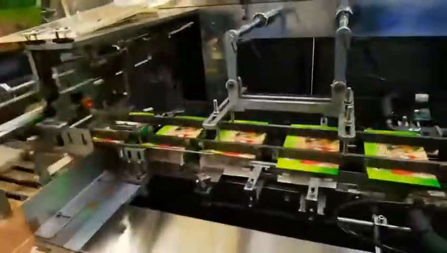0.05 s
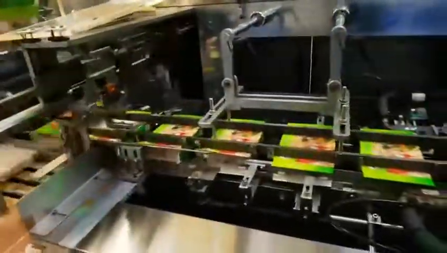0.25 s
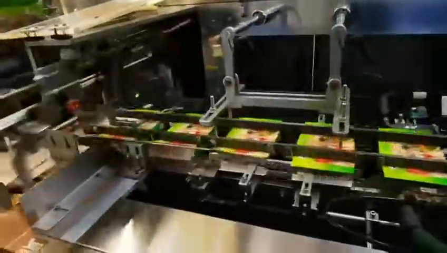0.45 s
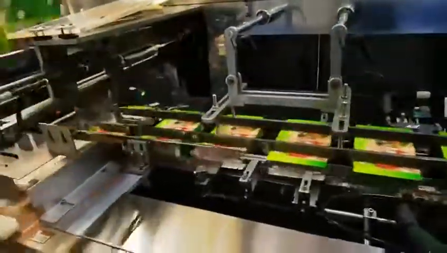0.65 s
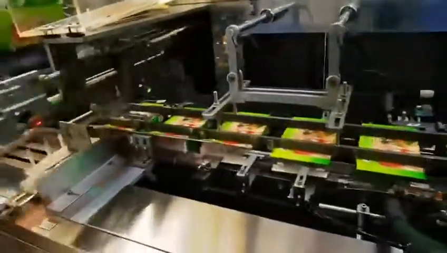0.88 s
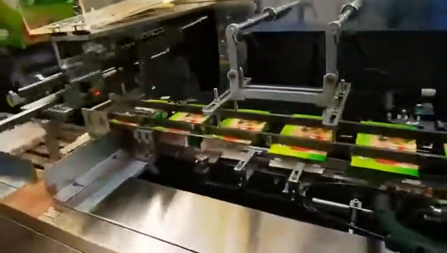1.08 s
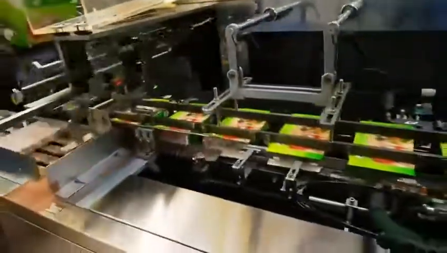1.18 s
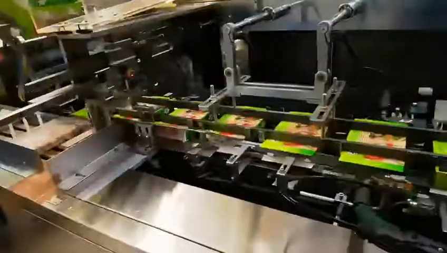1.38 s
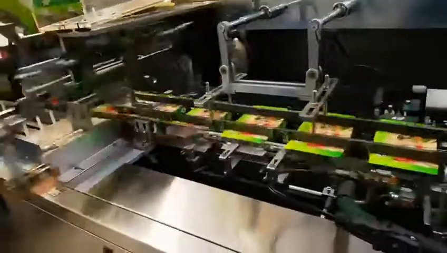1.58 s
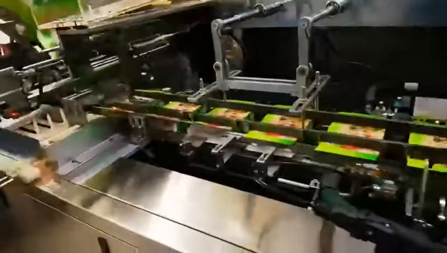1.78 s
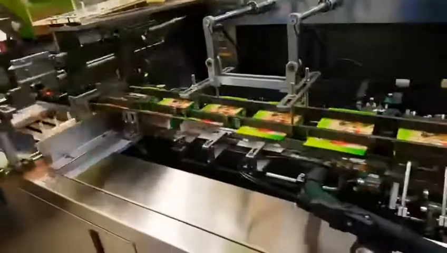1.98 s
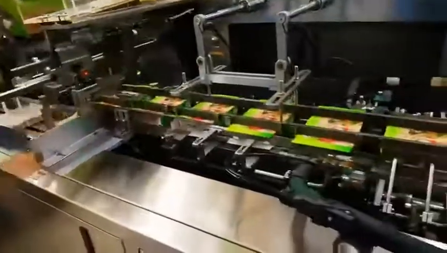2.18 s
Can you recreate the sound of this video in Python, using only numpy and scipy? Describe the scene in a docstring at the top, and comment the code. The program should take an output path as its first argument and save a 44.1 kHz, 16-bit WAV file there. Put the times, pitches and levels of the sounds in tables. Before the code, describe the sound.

Packing machine rattling and clacking in a factory hall, one sharp burst of venting air

```python
"""Cartons slide and a motor hums first, then a latch clicks, in a factory hall close by a cartoning machine.
Chains and arms rattle the steel frame and levers knock it: jolts and blows ring banks of resonances.
At a quarter second a valve vents air: a shrill whistle of port modes, then noise whose band widens downward.
The microphone rolls off the bass, and the recorder's gain control ducks after loud sound."""
import sys
import numpy as np
from scipy import signal
from scipy.fft import rfft, irfft, next_fast_len
from scipy.io import wavfile
from scipy.ndimage import uniform_filter1d, map_coordinates

SR = 44100
rng = np.random.default_rng(int(sys.argv[2]) if len(sys.argv) > 2 else 0)


def master(y):
    """Save y as 16-bit WAV."""
    cut = np.clip(np.atleast_2d(y).T, -1, 1)
    pcm = np.round(cut * 32767)  # scale
    wavfile.write(sys.argv[1], SR, pcm.astype(np.int16))


N = 99225


def amp(db):
    """Decibels to gain."""
    return 10 ** (np.asarray(db) / 20)


def unit(x):
    """Scale to rms 1."""
    return x / np.sqrt(np.mean(x ** 2) + 1e-20)


def along(points, hz):
    """(frequency [Hz], value) points read on a log frequency axis."""
    f, v = np.transpose(points)
    return np.interp(np.log(hz + 1), np.log(f + 1), v)


def clock():
    """Time of each sample [s]."""
    return np.arange(N) / SR


def level(rows):
    """Gain per sample from (time [s], level [dB]) rows."""
    return amp(np.interp(clock(), *np.transpose(rows)))


def wobble(knots_per_s):
    """A smooth curve through random knots."""
    knots = rng.standard_normal(400)
    return map_coordinates(knots, [clock() * knots_per_s], mode="wrap")


def noise():
    """White noise."""
    return rng.standard_normal(N)


def filtered(x, response):
    """x through a response given as a function of frequency, padded so that rings do not wrap."""
    m = next_fast_len(N + SR // 2)
    hz = np.fft.rfftfreq(m, 1 / SR)
    return irfft(rfft(x, m) * response(hz), m)[:N]


def coloured(x, spectrum):
    """x shaped by a (frequency [Hz], level [dB]) spectrum, at rms 1."""
    return unit(filtered(x, lambda hz: amp(along(spectrum, hz))))


def band(f, hz, width):
    """A broad causal band-pass, its width a share of its centre."""
    return 1 / (1 + 1j * (f / hz - hz / (f + 1)) / width)


def body(modes, f):
    """Causal response of a set of resonances, with alternating signs and unit power gain."""
    h = 0
    for k, (centre, width, db) in enumerate(modes):
        damping = 1j * f * width
        h = h + (-1) ** k * amp(db) * damping / (centre * centre - f * f + damping)
    return h / np.sqrt(np.mean(abs(h) ** 2))


def grains(per_s, spread_db):
    """Random tiny impacts of uneven size, at rms 1."""
    hits = rng.random(N) < per_s / SR
    return unit(hits * np.sign(noise()) * amp(spread_db * noise()))


def burst(start, attack_s, t60):
    """An envelope that rises, then dies away by 60 dB in t60 seconds."""
    age = np.maximum(clock() - start, 0)
    return (1 - np.exp(-age / attack_s)) * amp(-60 * age / t60)


def swell(start, rise_s, fall_db_per_s):
    """An envelope that climbs to 1, then falls steadily in dB."""
    age = clock() - start
    return np.clip(age / rise_s, 0, 1) * amp(-fall_db_per_s * np.maximum(age - rise_s, 0))


def add(out, s, x):
    """Mix x into out from time s."""
    part = out[round(s * SR):][:len(x)]
    part += x[:len(part)]


def panels(x, share, latest):
    """Close steel panels add reflections, up to latest samples late, that ripple the spectrum."""
    delays = rng.integers(latest // 10, latest, size=12)
    signs = rng.choice([-1, 1], size=12)
    copies = sum(s * np.roll(x, d) for d, s in zip(delays, signs)) / np.sqrt(len(delays))
    return (x + share * copies) / np.hypot(1, share)


# Decay of the hall around the machine: (frequency [Hz], t60 [s])
HALL_DECAY = [(150, 0.17), (1500, 0.094), (10000, 0.33)]


def room(x):
    """The hall's diffuse tail: decaying noise, shortest in the middle of the spectrum."""
    hz, t, z = signal.stft(rng.standard_normal(SR // 2), SR, nperseg=256)
    decay = amp(-60 * t / along(HALL_DECAY, hz)[:, None])
    tail = signal.istft(z * decay, SR, nperseg=256)[1]
    late_tail = np.pad(tail, (300, 0))  # it arrives 300 samples after the direct sound
    return signal.fftconvolve(x, late_tail / np.linalg.norm(tail))[:N]


# Shaking of the drive, before the hum and shake trims: (time [s], level [dB])
SHAKE_LEVEL = [(0.0, -58), (0.06, -44), (0.27, -41), (0.38, -47.5), (0.74, -40.5), (0.94, -57),
               (1.07, -45.5), (1.21, -47.5), (1.37, -38), (2.1, -44.5), (2.12, -40.5), (2.25, -55.5)]
# Dull bumps of the indexing drive: (time [s], level [dB])
DRIVE_BUMPS = [(0.243, -39), (1.046, -29), (1.44, -48), (2.124, -34.5)]
# Relative spectrum of the shaking drive: (frequency [Hz], level [dB per Hz])
DRIVE_SPECTRUM = [(25, -28), (42, -22), (55, -2.5), (80, -1), (130, -0.5), (200, -10.5), (330, -28.5)]
# Relative spectrum of the hall's din: (frequency [Hz], level [dB per Hz])
DIN_SPECTRUM = [(15, -41), (25, 2), (87, 6), (140, -25), (278, -37), (616, 0), (781, 2), (1070, 0.5),
                (1330, 0), (2780, -9), (3440, -7), (4250, -6), (9410, -6), (11000, -14), (14000, -25)]


def motor(hum_hz=98.7, hum_db=-11, shake_db=-3, hall_db=-44, bump_hz=85):
    """An unsteady hum, low shaking noise and decaying sine bumps, over the nearly steady din of the hall."""
    t = clock()
    waver = amp(3 * wobble(14))
    tone = np.sqrt(2) * np.sin(2 * np.pi * hum_hz * t + .5 * wobble(7.7))
    hum = amp(hum_db) * level(SHAKE_LEVEL) * waver * tone
    shake = amp(shake_db) * level(SHAKE_LEVEL) * coloured(noise(), DRIVE_SPECTRUM)
    bumps = np.zeros(N)
    for s, db in DRIVE_BUMPS:
        bumps += amp(db) * burst(s, attack_s=0.01, t60=0.12) * np.sin(2 * np.pi * bump_hz * (t - s))
    din = panels(coloured(noise(), DIN_SPECTRUM), share=0.64, latest=500)
    return hum + shake + bumps + amp(hall_db + wobble(6.06)) * din


def ticks(tick_db=-50):
    """Small loose parts tick at random all through the cycle and ring the steel."""
    taps = grains(per_s=45, spread_db=0.5)
    ring = filtered(taps, lambda f: body(RAIL_MODES + LATCH_MODES, f) * band(f, 3140, width=1.65))
    return amp(tick_db) * unit(ring)


# How hard the chain jolts the frame, before clustering: (time [s], level [dB])
RATTLE_LEVEL = [(0, -53), (.15, -47.5), (.24, -32.5), (.29, -43), (.47, -45), (.53, -34.5), (.68, -35),
                (.78, -34), (.83, -40), (.9, -56), (1.05, -48), (1.13, -42), (1.22, -45), (1.3, -34.5),
                (1.42, -33), (1.55, -37), (1.72, -38), (1.84, -34), (1.94, -36.5), (2, -49), (2.25, -49.5)]
# Resonances of the steel frame and guards: (frequency [Hz], width [Hz], level [dB])
FRAME_MODES = [(154, 61, -3.5), (210.4, 51, 0), (263, 135, -4), (413.3, 41, -1.5), (471, 18.3, 4),
               (554.3, 24, 1.5), (616.3, 21.2, 4), (742, 74, -3), (839, 49, 0.5), (931.6, 24, 6.5),
               (1025, 134, -17), (1240, 140, -9), (1490, 11, -11), (1900, 670, -15)]


def chain():
    """Links and rollers jolt the frame in uneven clusters and ring its resonances."""
    clusters = amp(2.0 * wobble(45.37))
    jolts = unit(grains(per_s=1300, spread_db=3) * clusters)
    return filtered(jolts * level(RATTLE_LEVEL), lambda f: body(FRAME_MODES, f))


# Cartons slipping past the belts: (time [s], level [dB], length [s])
SLIP_ARCHES = [(0.807, -44, 0.057), (1.287, -38, 0.17), (1.423, -43.5, 0.23), (1.91, -47, 0.31)]
# Relative spectrum of that sizzle: (frequency [Hz], level [dB per Hz])
SIZZLE_SPECTRUM = [(2500, -19), (4500, -18), (6400, 12.5), (8500, 1), (10900, 3.5), (12000, -7),
                   (14000, -12)]


def slips():
    """Smooth card swishes past in short arches of noise and fine grains."""
    arches = np.zeros(N)
    for s, db, length in SLIP_ARCHES:
        arches += amp(db) * np.sin(np.pi * np.clip((clock() - s) / length, 0, 1))
    return arches * coloured(noise() + grains(per_s=2800, spread_db=4), SIZZLE_SPECTRUM)


# Cartons sliding on the guides, before the rub and rail trims: (time [s], level [dB])
SLIDE_LEVEL = [(0, -42.5), (.05, -42), (.15, -53), (.45, -39.5), (.56, -31.5), (.68, -42), (.78, -50),
               (.83, -33.5), (.92, -54), (1, -43), (1.13, -42), (1.26, -52.5), (1.37, -43.5), (1.51, -48),
               (1.6, -40), (1.74, -44.5), (1.89, -50.5), (1.96, -41.5), (2.08, -51), (2.25, -43.5)]
# Relative spectrum of rubbing cardboard: (frequency [Hz], level [dB per Hz])
CARD_SPECTRUM = [(400, 2), (1100, 3), (1800, -1), (2800, 4.5), (3600, 2.5), (4800, 0.5), (6500, -3),
                 (8500, -3), (11000, -1.5), (12000, -11), (14000, -17)]
# Resonances of the thin guide rails: (frequency [Hz], width [Hz], level [dB])
RAIL_MODES = [(1039, 48, 8.5), (1223, 50, 9.5), (1591, 54, 4), (1967, 47, 2), (2100, 57, 4.5),
              (2438, 56, 2.5), (2738, 29, -10), (3097, 36, 5.5), (3340, 210, -3), (3795, 250, -1),
              (4510, 54, -1), (5200, 710, -10.5), (7100, 1100, -8.5)]


def cartons(rub_db=1.5, rail_db=-2):
    """Cardboard rubs and ticks along the guides and rings the rails."""
    rub = coloured(unit(noise() + 1.2 * grains(per_s=920, spread_db=2.0)), CARD_SPECTRUM)
    rail_ticks = unit(filtered(grains(per_s=1500, spread_db=2.5), lambda f: body(RAIL_MODES, f)))
    unevenness = amp(2.14 * wobble(50.23))
    return (amp(rub_db) * rub + amp(rail_db) * rail_ticks) * level(SLIDE_LEVEL) * unevenness


# Latches and carton flaps, before the steel rings: (time [s], level [dB], centre [Hz],
# width [share of centre], t60 [s], snap over that level [dB])
LATCH_CLICKS = [(0.023, -35.5, 2250, 0.22, 0.31, 8), (0.055, -28, 5840, 0.088, 0.031, 5),
                (0.71, -22.5, 2870, 0.11, 0.19, -13), (0.8403, -20.5, 6750, 0.83, 0.035, -6),
                (0.8456, -32, 4670, 1.75, 0.015, 13), (0.96, -26, 3620, 0.66, 0.076, 4),
                (1.393, -21, 3620, 0.12, 0.11, 5), (1.568, -35.5, 3950, 1.04, 0.29, 7),
                (1.665, -37.5, 3000, 2.1, .05, -4), (1.772, -28, 2550, 0.16, 0.08, -6),
                (1.821, -26, 3330, 0.16, 0.044, 8), (1.952, -33, 3400, .9, 0.063, -4),
                (2.014, -29.5, 4400, 0.81, 0.06, 3), (2.037, -38, 4500, 0.72, 0.085, 2),
                (2.129, -29, 3720, 0.078, 0.26, 0), (2.227, -36, 1520, 0.23, 0.045, 5)]
# Resonances of the small steel parts: (frequency [Hz], width [Hz], level [dB])
LATCH_MODES = [(1000, 260, 0), (1710, 380, 5.5), (2697, 50, 4.5), (2930, 200, -5), (3660, 270, -2.5),
               (4060, 180, -1), (5240, 640, -1), (6800, 1200, -2), (10240, 2000, -4.5)]


def latches():
    """A sharp snap and a short rattle ring the small steel parts."""
    out = np.zeros(N)
    for s, db, hz, width, t60, snap_db in LATCH_CLICKS:
        rattle = burst(s, attack_s=0.0015, t60=t60)
        snap = amp(snap_db) * burst(s, attack_s=.0001, t60=0.0028)
        strike = (rattle + snap) * np.sign(noise())
        out += amp(db) * filtered(strike, lambda f: band(f, hz, width))
    return amp(8.5) * filtered(out, lambda f: body(LATCH_MODES, f))


def blow(response, chatter_db, t60):
    """One firm contact and its loose chatter ring a body; as much energy as 10 ms at rms 1."""
    age = np.arange(2 * len(response) - 2) / SR
    chatter = rng.standard_normal(len(age)) * amp(-60 * age / t60)
    force = (age == 0) + amp(chatter_db) * chatter / np.linalg.norm(chatter)
    ring = irfft(rfft(force) * response)
    return ring / np.linalg.norm(ring) * np.sqrt(SR / 100)


# Blows of levers and linkages: (time [s], frame thud level [dB], rail clack level [dB], clack centre [Hz])
LEVER_KNOCKS = [(.232, -34, -35, 940), (0.326, -27.5, -33.5, 900), (0.516, -39, -29, 950),
                (.545, -30, -27, 990), (0.623, -37.5, -41, 1160), (0.653, -32, -44, 900),
                (.724, -24.5, -28.5, 1160), (.803, -32.5, -36, 800), (.9618, -50, -34.5, 1500),
                (1.104, -36, -33, 1010), (1.154, -43.5, -34, 1450), (1.396, -24.5, -31, 920),
                (1.411, -33, -37, 860), (1.463, -31, -44, 590), (1.523, -34, -36, 880),
                (1.573, -41, -31, 1180), (1.605, -35.5, -33, 1130), (1.633, -31.5, -27.5, 1100),
                (1.708, -34.5, -32, 1900), (1.772, -48, -32.5, 1220), (1.798, -33.5, -29, 830),
                (1.829, -34, -32, 990), (1.884, -36, -37, 880), (1.918, -43, -36, 1240),
                (2.177, -44.5, -30.5, 1190)]
THUD_HZ = 483  # the thuds drive the frame hardest here
THUD_T60, CLACK_T60 = .07, .12  # decay of the contact chatter [s]


def levers(thud_chatter_db=-5, clack_chatter_db=0):
    """Each blow rings the frame's low resonances and clacks on frame and rails."""
    f = np.fft.rfftfreq(8192, 1 / SR)
    frame, rails = body(FRAME_MODES, f), body(RAIL_MODES, f)
    thud_body = frame * band(f, THUD_HZ, width=0.64)
    clack_body = 2.5 + rails + 0.88 * frame  # the constant passes the bare contact
    out = np.zeros(N)
    for s, thud_db, clack_db, hz in LEVER_KNOCKS:
        add(out, s, amp(thud_db) * blow(thud_body, thud_chatter_db, THUD_T60))
        clack = blow(clack_body * band(f, hz, width=0.85) ** 2, clack_chatter_db, CLACK_T60)
        add(out, s, amp(clack_db) * clack)
    return out


VENT_S = .256  # the valve opens [s]
# Whistling modes of the exhaust port, relative: (frequency [Hz], opening level [dB], lingering level [dB])
PORT_MODES = [(6143, -26, 0), (6246, -26, 1), (6500, -16, -2), (6611, -7, -3), (6729, -6, -4),
              (6848, -3, -3), (6904, -10, -4), (7035, -8, -7), (7118, -11, -4), (7211, 1, -4),
              (7295, -5, -6), (7422, -1, -1), (7549, -3, -7)]
# The shriek as the valve opens, before the opening trim: (time [s], level [dB])
SHRIEK_LEVEL = [(.253, -90), (.258, -23), (.267, -23.5), (.279, -14.5), (.291, -18), (.305, -24),
                (.36, -34), (.5, -90)]


def whistle(open_db=-3, linger_db=-31, drift=0.65):
    """The port's modes shriek as the valve opens, then sing on, unsteadily, in the jet."""
    opening = level(SHRIEK_LEVEL)
    lingering = swell(VENT_S + .025, rise_s=.025, fall_db_per_s=58)
    out = np.zeros(N)
    for hz, first_db, later_db in PORT_MODES:
        flutter = amp(4 * wobble(80))
        gain = amp(open_db + first_db) * opening + amp(linger_db + later_db) * flutter * lingering
        phase = 2 * np.pi * hz * clock() + drift * wobble(112.6) + wobble(15.2)
        out += gain * np.sin(phase)
    return out


# Lower edge of the jet's band: start [Hz], end [Hz], time constant of the drop [s]
JET_HZ, WIDEST_HZ, WIDEN_S = 7100, 4120, .019


def widening(x, ragged_hz=280, patchy_db=0.2):
    """The jet's band tears open downward; eddies make its edge ragged and its level slightly patchy."""
    hz, t, z = signal.stft(x, SR, nperseg=256)
    age = np.maximum(t - VENT_S - .01, 0)
    edge = WIDEST_HZ + (JET_HZ - WIDEST_HZ) * np.exp(-age / WIDEN_S)
    eddies = uniform_filter1d(rng.standard_normal(z.shape), size=3, axis=0)  # smoothed across frequency
    eddies = unit(uniform_filter1d(eddies, size=4, axis=1))  # and across time
    passed = np.clip((hz[:, None] - edge + ragged_hz * eddies) / 900 + .5, 0, 1)  # a 900 Hz slope
    return unit(signal.istft(z * passed * amp(patchy_db * eddies), SR, nperseg=256)[1][:N])


# Relative spectrum of the fresh jet: (frequency [Hz], level [dB per Hz])
JET_SPECTRUM = [(2500, -35), (3900, -7.5), (4400, -8.5), (5300, -10), (6100, -4), (6900, -3.5), (7450, 1.5),
                (7750, -14), (9300, -17.5), (11000, -20.5), (12800, -24), (14000, -28)]
# Relative spectrum of the spent jet: (frequency [Hz], level [dB per Hz])
SPENT_SPECTRUM = [(1500, -21), (2500, -2), (3050, 4), (3200, 9), (3380, 3.5), (4200, -25), (5000, -16),
                  (7300, -25), (7900, -2), (10800, -8), (13500, -34)]


def air(jet_db=-15.5, spent_db=-36, spent_lag_s=0.033, empty_s=0.62):
    """The turbulent jet widens down from the whistle, loses pressure to a softer hiss, and runs out."""
    pressure = swell(VENT_S + .012, rise_s=.025, fall_db_per_s=48)
    jet = amp(jet_db) * widening(coloured(noise(), JET_SPECTRUM)) * pressure
    spent_swell = swell(VENT_S + spent_lag_s, rise_s=0.13, fall_db_per_s=0)
    spent = amp(spent_db) * coloured(noise(), SPENT_SPECTRUM) * spent_swell
    gusts = amp(1.2 * wobble(108.4))
    supply = amp(-60 * np.maximum(clock() - empty_s, 0))  # drops 60 dB per second
    return supply * (whistle() + panels((jet + spent) * gusts, share=0.35, latest=260))


def scene(room_db=-9):
    """The machine close by, in its hall."""
    sliding = panels(cartons() + slips(), share=1.0, latest=400)
    parts = ticks() + chain() + sliding + latches() + levers()
    return (motor() + parts + amp(room_db) * room(parts) + air())[None]


LOW_CUT_HZ = 32  # the microphone's bass roll-off
TOP_HZ = 14200  # nothing passes from here up


def record(dry, threshold_db=-24, release_db_per_s=28):
    """Gain control ducks on loud sound and recovers slowly; then the bass roll-off and treble limit."""
    x, t = dry[0], clock()

    def follow(v):
        """Smooth with a time constant of 600 samples."""
        return signal.lfilter([1 / 600], [1, 1 / 600 - 1], v)

    over_db = np.maximum(10 * np.log10(follow(x ** 2) + 1e-12) - threshold_db, 0)
    # hold each peak and let it sink at the release rate
    held_db = np.maximum.accumulate(over_db + release_db_per_s * t) - release_db_per_s * t
    ducked = x * amp(-follow(held_db))
    return filtered(ducked, lambda hz: (hz < TOP_HZ) * np.minimum(hz / LOW_CUT_HZ, 1) ** 2)[None]


dry = scene()
out = record(dry)
master(out)
```